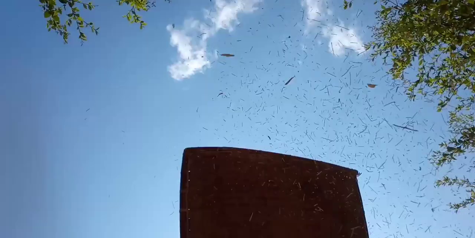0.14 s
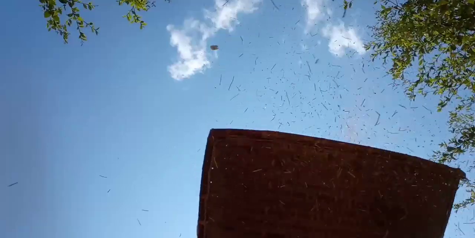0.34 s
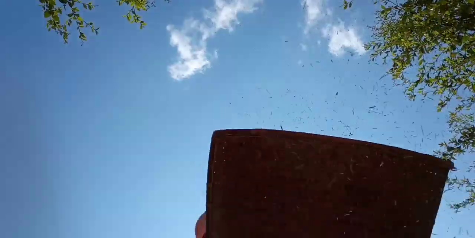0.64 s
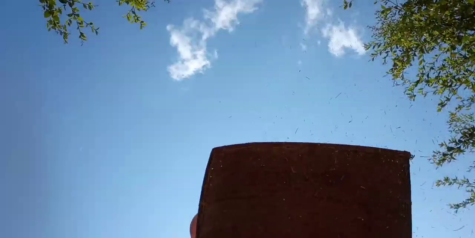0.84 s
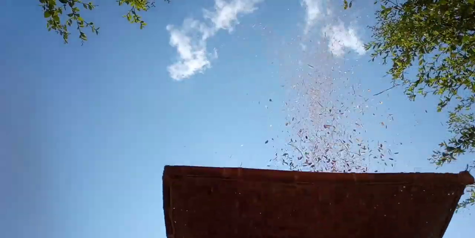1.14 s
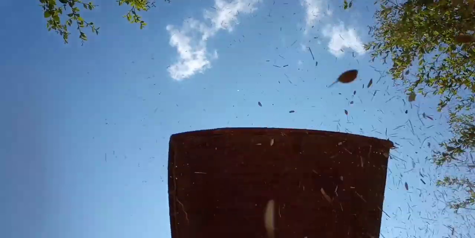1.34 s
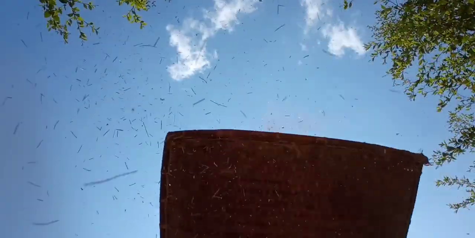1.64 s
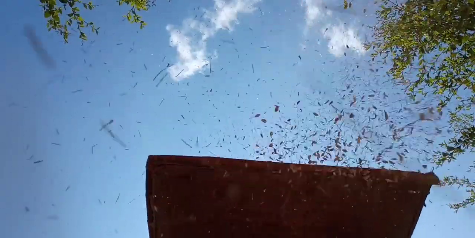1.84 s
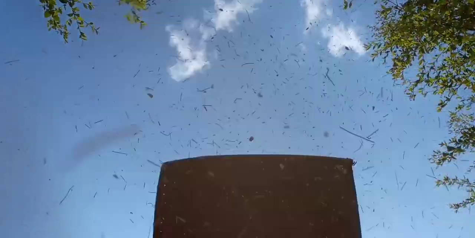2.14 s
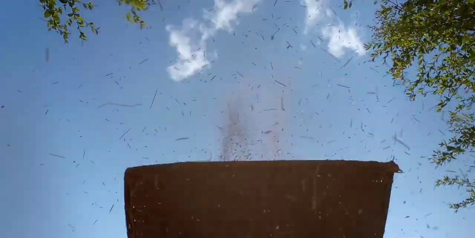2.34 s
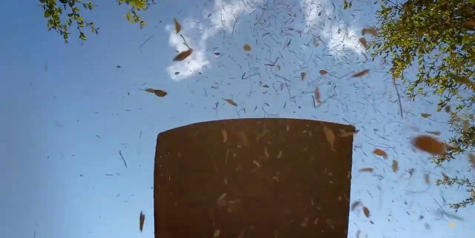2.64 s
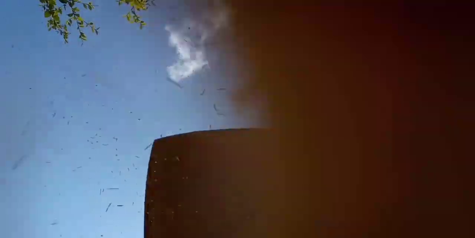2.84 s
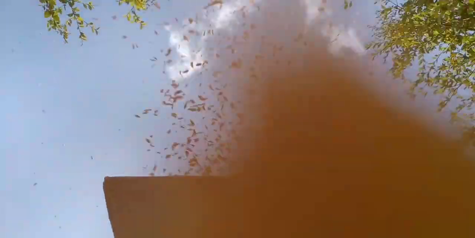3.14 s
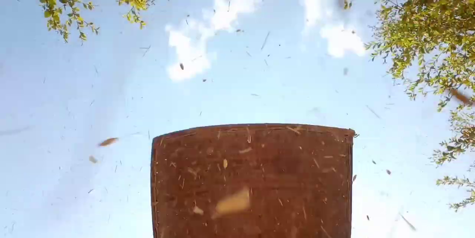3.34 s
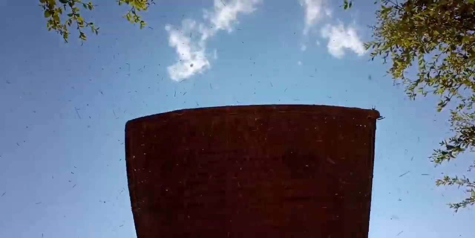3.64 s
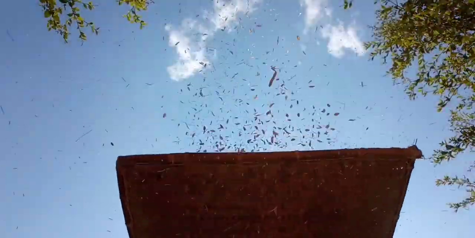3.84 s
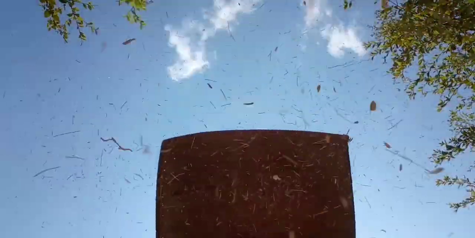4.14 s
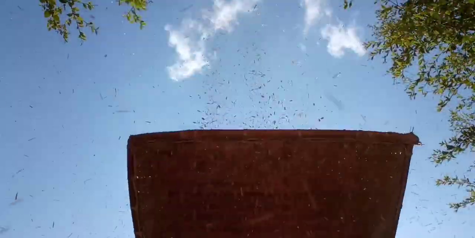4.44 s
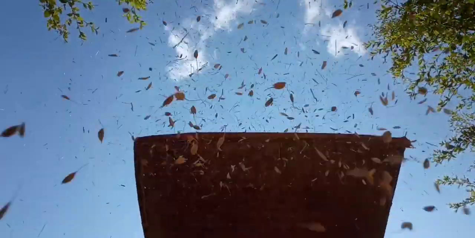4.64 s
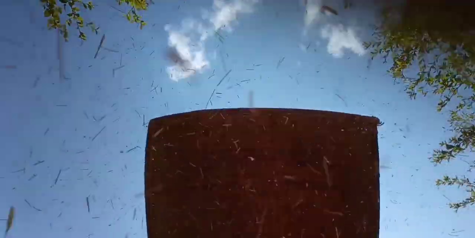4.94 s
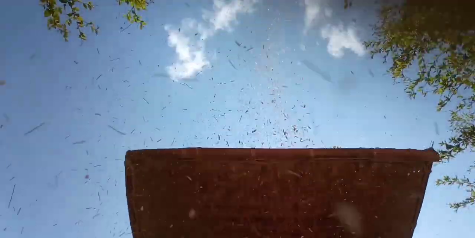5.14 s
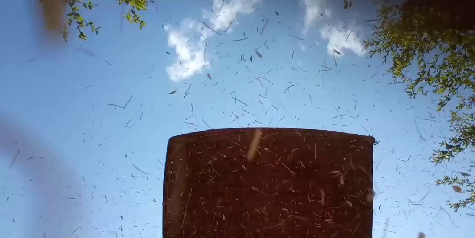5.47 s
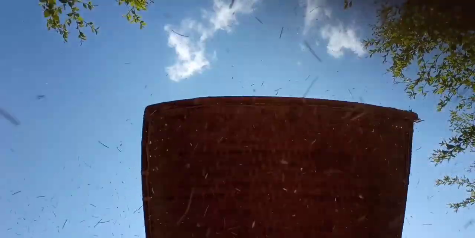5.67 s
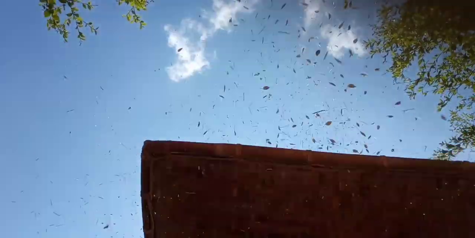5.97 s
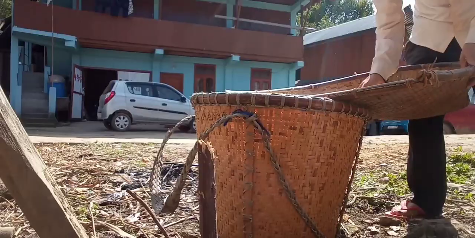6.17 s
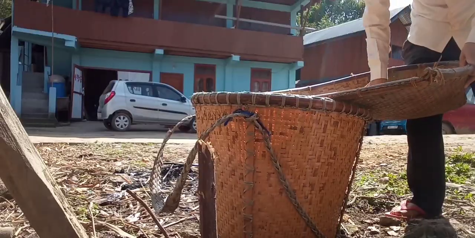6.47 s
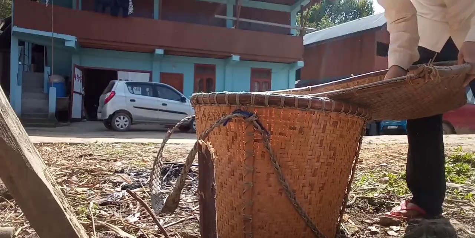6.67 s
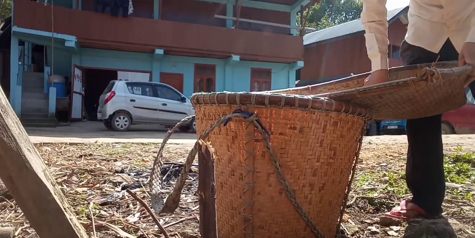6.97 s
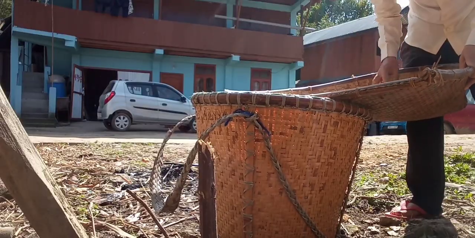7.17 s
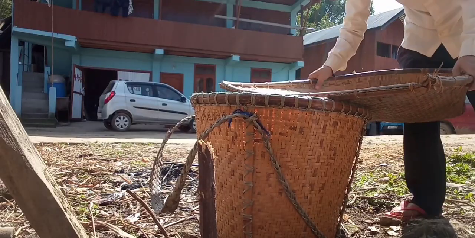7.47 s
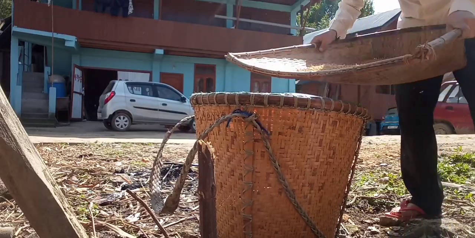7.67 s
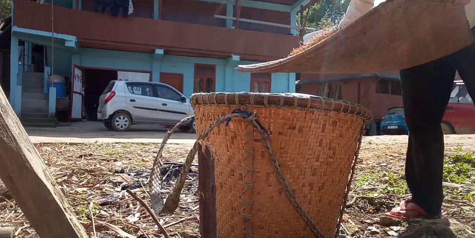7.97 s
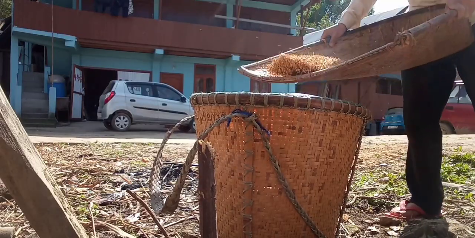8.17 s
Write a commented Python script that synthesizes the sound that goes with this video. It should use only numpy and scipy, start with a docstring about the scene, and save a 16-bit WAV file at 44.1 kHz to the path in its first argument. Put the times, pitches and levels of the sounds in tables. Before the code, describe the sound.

A quiet outdoor place, with the microphone on the ground just below a flat bamboo winnowing tray. A light patter of husks opens the scene. From 0.2 s, nine tosses of grain fall back on the weave roughly every 0.7 s, the last at 5.7 s. Each is a dense, dry rattling swish of about a quarter second, with muted drumming beneath and a brighter final wave; later ones are somewhat louder. Between them chaff crackles and ticks, thickest and closest around 3.2 to 3.5 s and again after 4 s. At 2.2 s a seed knocks the microphone with a short thud and tiny bounces; at 2.5 s grain slips along the tray. Just after 6 s the close sound stops abruptly. Much fainter and farther off, a hand spreads grain in soft scraping strokes. From 7.4 s the tray is tipped, with slight dull bumps, and grain rustles in surges to the end.

```python
"""Grain is winnowed on a flat bamboo tray outdoors, just above a microphone lying on the ground.
From 0.2 s nine tosses shower back on the weave (dense clicks, filtered); husks patter between (noise ticks).
At 2.2 s a seed strikes the microphone housing (damped sines). From 6 s, farther off, a hand spreads the
grain; from 7.4 s the tray is tipped toward a basket (clicks in strokes). Faint hollow notes and dull bumps
(sines) are heard now and then; quiet air (filtered noise) lies under it all."""
import sys
import numpy as np
from scipy import signal
from scipy.io import wavfile
from scipy.ndimage import uniform_filter1d

SR = 44100
rng = np.random.default_rng(int(sys.argv[2]) if len(sys.argv) > 2 else 0)


def pcm_store(signal):
    """Save signal as 16-bit PCM."""
    levels = np.round(np.clip(np.atleast_2d(signal), -1, 1) * 32767)
    wavfile.write(sys.argv[1], SR, levels.astype(np.int16).T)


N = 366471

# tosses as the grain lands: t/s, time to last wave/s, rattle level/dB, last wave level/dB re rattle,
# fall/dB per s, drumming level/dB re rattle, sheen level/dB re rattle
TOSSES = [(0.238, 0.27, -37, 1.5, 262, -6.5, -3.5), (0.924, 0.27, -36, -1.5, 304, -5.5, -5.5),
          (1.618, 0.22, -32, 4, 445.5, -6, -6.5), (2.25, 0.22, -32.5, 3.5, 282, -8.5, -6.5),
          (2.9, 0.22, -32.5, 2, 340, -6.5, -6.5), (3.598, 0.24, -31, 1, 344.5, -6, -7.5),
          (4.291, 0.24, -31, 1.5, 319, -7, -7.5), (5.006, 0.23, -30, 0.5, 216.5, -7, -7.5),
          (5.702, 0.2, -31, 2.5, 266, -6, -7)]
# grain slips along the tray after a toss: t/s, length/s, rattle level/dB, drumming level/dB re rattle,
# sheen level/dB re rattle
SLIPS = [(0.61, 0.032, -60.5, -21, -19), (0.66, 0.12, -66.5, -19, -17), (0.788, 0.026, -61.5, -28, -5),
         (2.5, 0.13, -38, -11, -4.5)]
# strokes of a hand spreading the grain: t/s, length/s, rattle level/dB, tray level/dB re rattle,
# sheen level/dB re rattle
SWEEPS = [(6.03, 0.16, -73, 1.5, -4), (6.165, 0.79, -59.5, -7.5, -0.5), (6.21, 0.056, -56.5, -6.5, -4),
          (6.295, 0.093, -53.5, -6.5, 0.5), (6.465, 0.045, -53, -2.5, -4), (6.66, 0.053, -53, -3.5, -1),
          (6.802, 0.011, -54, -19, -4), (6.965, 0.125, -70, -5, 5), (7.25, 0.022, -84, -12, -2)]
# tray lifted and tipped, grain runs to its lip in surges: columns as SWEEPS
TIPS = [(7.375, 0.053, -81, 11.5, -3), (7.43, 0.14, -66.5, 4, -4.5), (7.615, 0.21, -54, -7, 1.5),
        (7.665, 0.033, -56, -5, 6), (7.945, 0.14, -60.5, -2, 3), (7.985, 0.052, -51.5, -16, 4.5),
        (8.14, 0.059, -83, 20.5, -7), (8.195, 0.022, -48.5, -6, 1), (8.29, 0.022, -70.5, -3, 8)]
# clouds of chaff between the tosses: t/s, length/s, level at the start/dB
CHAFF = [(0.0, 0.16, -48.5), (1.352, 0.2, -49.5), (1.972, 0.19, -50), (2.672, 0.18, -43.5),
         (3.251, 0.32, -32), (3.993, 0.29, -39.5), (4.686, 0.31, -38.5), (5.384, 0.31, -42)]
# power share of fine sprinkle: in a thin cloud, in a thick cloud
SPRINKLE_SHARES = [0.2, 0.7]
# loudest husks and straws landing close by: t/s, nominal peak level/dB, own ring f/Hz,
# weight level/dB re peak, sharpness level/dB re peak
HUSKS = [(0.0681, -31, 1130, -13, -8), (0.1202, -27, 4300, -13, -23), (1.3566, -39, 6000, -26, -30),
         (1.375, -31, 6240, -21, -21), (1.3978, -33, 6680, -8, 1), (1.515, -36.5, 1950, -27, -32),
         (1.984, -27, 6370, -13.5, -18), (2.0364, -30, 6600, -4, -2.5), (2.0949, -23, 6440, -11.5, -8),
         (2.6834, -26, 6600, -0.5, 6.5), (2.7025, -29.5, 6900, -27, -2), (2.7982, -28, 6830, -35, -19),
         (2.8447, -20.5, 2030, -17.5, -20), (3.2247, -27, 4510, -31, -19), (3.2417, -15, 6030, -35, -7),
         (3.3775, -19, 5260, -15, -16), (3.445, -21.5, 5600, -21, -15), (3.4657, -25, 1290, -15, -15),
         (3.503, -34, 6440, -4, -8), (3.9901, -18.5, 4600, -14, -11.5), (4.0014, -24, 6900, -13, -5),
         (4.025, -20.5, 5700, -13, -6), (4.1395, -31.5, 6560, -29, -14), (4.154, -22.5, 5900, -13.5, -12.5),
         (4.1884, -29, 2520, -15, -22), (4.247, -31, 6060, -22, -11), (4.6797, -26, 6900, -21, -1),
         (4.7033, -22, 6660, -2, 6), (4.7485, -22, 6300, -36, -7), (4.775, -26, 6500, -18, -8),
         (4.8798, -26, 4500, -22, -9), (4.9185, -28.5, 6900, -11, -5), (5.35, -30, 6760, -8, 8),
         (5.3872, -21, 6300, -19, -11), (5.4054, -26.5, 5560, -8, -3), (5.481, -32, 7100, -4, 2),
         (5.6482, -33, 4730, -28, -5), (7.267, -54.5, 5460, -33, -3)]
# a seed strikes the microphone housing and bounces: t/s, level/dB
KNOCKS = [(2.163, -14), (2.1663, -25), (2.1712, -30.5)]
# modes of the housing: f/Hz, level/dB re knock, t60/s
HOUSING_MODES = [(108, -8, 0.021), (260, -10, 0.0051), (530, -5, 0.0051), (1020, -5.5, 0.0035),
                 (6180, -22, 0.013)]
# faint hollow notes: t at the middle/s, mean f/Hz, level/dB
HOLLOWS = [(0.636, 506, -65), (1.3, 506, -73), (6.086, 506, -58), (6.337, 152, -59), (6.771, 147, -64),
           (7.381, 405, -66), (7.629, 358, -67), (8.143, 378, -56), (8.276, 515, -66)]
# dull low bumps, early ones as chaff strikes the microphone housing, later ones from the tray:
# t/s, f/Hz, level/dB
BUMPS = [(1.611, 87, -37), (3.25, 77, -56), (3.299, 120, -39), (3.989, 94, -48), (7.406, 126, -56),
         (7.434, 357, -53.5), (7.475, 257, -50.5), (7.938, 75, -61), (8.232, 60, -66)]
# spectrum of the drumming weave: f/Hz, relative level/dB
DRUMMING_SPECTRUM = [(18, -50), (30, -38.5), (111, -6), (164, -0.5), (321, -2), (454, -0.5), (520, -3),
                     (618, -1), (1060, -8), (1420, -5.5), (2720, 8.5), (3000, -9.5), (3900, -39),
                     (6600, -120)]
# spectrum of kernels rattling on the weave: f/Hz, relative level/dB
RATTLE_SPECTRUM = [(700, 23.5), (1100, 0.5), (1600, -6), (2200, -2), (2800, 0.5), (3400, -0.5),
                   (4800, -2.5), (6000, -2), (6700, -1.5), (7300, -7.5), (8000, -9.5), (10300, -6),
                   (12500, -8.5), (16000, -14)]
# spectrum of landing husks: f/Hz, relative level/dB
PATTER_SPECTRUM = [(40, -32), (120, -4), (300, 1.5), (600, 1.5), (1100, -1.5), (2000, -2.5), (3000, -2),
                   (4500, 0), (5800, 2.5), (6600, 3), (8000, -5.5), (10500, -3), (13000, -6.5), (16000, -9)]
# spectrum of grain spread by hand: f/Hz, relative level/dB
SWEEPING_SPECTRUM = [(30, -29), (130, -5), (250, -7.5), (450, -10.5), (980, -2.5), (1140, -6), (1310, -1.5),
                     (1550, -6.5), (2100, -5), (3270, 3.5), (4400, 2), (5300, -2.5), (6650, 0), (8000, -7),
                     (10200, 1), (16000, -8.5)]
# spectrum of grain running as the tray tips: f/Hz, relative level/dB
TIPPING_SPECTRUM = [(30, -42.5), (120, 0), (220, -16), (350, -3), (460, -8), (950, -1.5), (1580, -5.5),
                    (3000, 6), (5400, 3.5), (6500, 3.5), (8200, -2.5), (9900, 6), (16000, -5.5)]
# spectrum of quiet outdoor air: f/Hz, relative level/dB
AIR_SPECTRUM = [(25, -4), (90, 0), (170, -5), (300, -14.5), (700, -26.5), (1500, -15), (3500, -15.5),
                (5500, -10), (8000, -28), (11000, -17), (16000, -31.5)]

AIR_DB = -86
TRAY_TOP_HZ, SHEEN_FOOT_HZ, EDGE_HZ = 1600, 7500, 16050
# a shower builds quickly, sags as it thins, and ends in a last wave rich in light husks
TOSS_RISE_DB_PER_S, TOSS_SAG_DB_PER_S, WAVE_S, WAVE_SHEEN_DB = 850.5, 14, 0.048, 3.5
# the weave drums fully only once the weight has settled on it
DRUM_START_DB, DRUM_LAG_S = -13.5, 0.027
SLIP_RISE_DB_PER_S, SLIP_FALL_DB_PER_S = 500, 370
SWEEP_RISE_DB_PER_S, SWEEP_FALL_DB_PER_S = 598, 380
TIP_RISE_DB_PER_S, TIP_FALL_DB_PER_S = 549, 478
CHAFF_RISE_DB_PER_S, CHAFF_THINNING_DB_PER_S, CHAFF_FALL_DB_PER_S = 1100, 58, 503
CRUNCHES_PER_S = 480
# the near sound of the showers stops abruptly
CLOSE_UNTIL_S, CUT_DB_PER_S = 6.016, 4000
# level curves are drawn every 32 samples
CLOCK_S = np.arange(0, N + 32, 32) / SR


def showers():
    """Thousands of kernels land on the tray; the weave drums as their weight comes down."""
    slips = strokes(SLIPS, SLIP_RISE_DB_PER_S, SLIP_FALL_DB_PER_S)
    level, drum_gain, sheen_gain = gains([toss(*row) for row in TOSSES] + slips)
    level = level * together([swell_db(0, CLOSE_UNTIL_S, CUT_DB_PER_S, CUT_DB_PER_S)])
    flow = clumps(depth_db=0.1, size=150)
    kernels = patchy(impacts(per_s=14000, spread_db=1.0) * flow, depth_db=1.0)
    drumming = patchy(impacts(per_s=5000, spread_db=2.0) * flow, depth_db=2.5, size=1024)
    body = colour(drumming, DRUMMING_SPECTRUM)
    shell = colour(kernels, RATTLE_SPECTRUM)
    return level * voiced(body, shell, drum_gain, sheen_gain)


def toss(s, length_s, level_db, wave_db, fall_db_per_s, drum_db, sheen_db):
    """Rattle, drumming and sheen of one shower, in dB: the rattle thins while the weight on the weave stays."""
    age_s = np.clip(CLOCK_S - s, 0, length_s)
    wave = np.exp(-((length_s - age_s) / WAVE_S) ** 2)
    flow_db = level_db + swell_db(s, length_s, TOSS_RISE_DB_PER_S, fall_db_per_s) + wave_db * wave
    rattle_db = flow_db - TOSS_SAG_DB_PER_S * age_s
    drumming_db = flow_db + drum_db + DRUM_START_DB * np.exp(-age_s / DRUM_LAG_S)
    return rattle_db, drumming_db, rattle_db + sheen_db + WAVE_SHEEN_DB * wave


def chaff():
    """Light husks patter down, each a tiny crunch; in a thick cloud they merge into a fine sprinkle."""
    curves_db = []
    for s, length_s, start_db in CHAFF:
        thinning_db = CHAFF_THINNING_DB_PER_S * np.maximum(CLOCK_S - s, 0)
        curves_db.append(start_db + swell_db(s, length_s, CHAFF_RISE_DB_PER_S, CHAFF_FALL_DB_PER_S) - thinning_db)
    level = together(curves_db)
    t = np.arange(600) / SR
    landings = impacts(CRUNCHES_PER_S, spread_db=4, largest=2.0) ** 2
    dying_power = signal.oaconvolve(landings, np.exp(-t / 0.0004))[:N]
    crunch = np.sqrt(abs(dying_power)) * rng.standard_normal(N)
    crunch = evened(colour(patchy(crunch, depth_db=3.5, size=128), PATTER_SPECTRUM))
    sprinkle = evened(colour(impacts(per_s=8300, spread_db=3.5), PATTER_SPECTRUM))
    share = np.interp(20 * np.log10(level), [-50, -35], SPRINKLE_SHARES)
    return level * (np.sqrt(1 - share) * crunch + np.sqrt(share) * sprinkle)


def husks(rattle_below_peak_db=11.0, crest_db=19.5):
    """A close husk gives a crisp tick with a brief ring of its own, then settles with a weaker touch."""
    out, t = np.zeros(N), np.arange(1500) / SR
    for s, peak_db, hz, weight_db, sharp_db in HUSKS:
        settle_t = t - rng.uniform(0.0017, 0.0037)
        touch = 0.55 * (settle_t > 0) * np.exp(-abs(settle_t) / 0.00061)
        contact = np.exp(-t / 0.0011) + touch + 0.058 * np.exp(-t / 0.029)
        crunch = colour(contact * rng.standard_normal(len(t)), PATTER_SPECTRUM)
        ring = np.exp(-t / 0.0017) * np.sin(2 * np.pi * hz * t)
        shell = evened(crunch) + 0.24 * evened(ring)
        tick = voiced(crunch, shell, amp(weight_db + rattle_below_peak_db), amp(sharp_db + rattle_below_peak_db))
        add(out, s, amp(peak_db - crest_db) * evened(tick))
    return out


def knock():
    """A seed cracks on the housing and skitters off; the housing answers with a short thud."""
    out, t = np.zeros(N), np.arange(3000) / SR
    thud = sum(amp(db - 60 * t / t60_s) * np.sin(2 * np.pi * hz * t) for hz, db, t60_s in HOUSING_MODES)
    for s, level_db in KNOCKS:
        crack = (0.48 * np.exp(-t / 0.0031) + 0.047 * np.exp(-t / 0.019)) * rng.standard_normal(len(t))
        add(out, s, amp(level_db) * (thud + crack))
    return signal.sosfilt(signal.butter(2, 85, "highpass", fs=SR, output="sos"), out)


def hand():
    """Strokes of a hand push the grain over the tray."""
    movements = strokes(SWEEPS, SWEEP_RISE_DB_PER_S, SWEEP_FALL_DB_PER_S)
    return slide(movements, SWEEPING_SPECTRUM, per_s=8600, clump_db=0.7)


def tipping():
    """The grain runs to the lip of the tipped tray, denser and more clumped than under the hand."""
    movements = strokes(TIPS, TIP_RISE_DB_PER_S, TIP_FALL_DB_PER_S)
    return slide(movements, TIPPING_SPECTRUM, per_s=17000, clump_db=1.8)


def slide(movements, spectrum, per_s, clump_db):
    """Kernels roll over each other and scrape along the weave."""
    level, tray_gain, sheen_gain = gains(movements)
    flow = clumps(clump_db, size=260)
    kernels = patchy(impacts(per_s, spread_db=1.0) * flow, depth_db=1.9)
    scraping = patchy(impacts(per_s=4000, spread_db=0.5) * flow, depth_db=4.0, size=1024)
    return level * voiced(colour(scraping, spectrum), colour(kernels, spectrum), tray_gain, sheen_gain)


def bumps():
    """A dull, heavily damped low note that dies at once: chaff on the housing early on, the tray later."""
    out, t = np.zeros(N), np.arange(4000) / SR
    for s, hz, level_db in BUMPS:
        add(out, s, amp(level_db) * np.exp(-t / 0.015) * np.sin(2 * np.pi * hz * t))
    return out


def hollows():
    """A short, low note swells and fades, slightly unsteady in pitch."""
    out, t = np.zeros(N), np.arange(3000) / SR
    for s, hz, level_db in HOLLOWS:
        waver = 1 + 0.035 * evened(uniform_filter1d(rng.standard_normal(len(t)), size=200))
        note = np.sin(2 * np.pi * np.cumsum(hz * waver) / SR) * np.hanning(len(t))
        add(out, s - t[-1] / 2, amp(level_db) * note)
    return out


def outdoor_air():
    """Steady noise, coloured as quiet outdoor air."""
    return amp(AIR_DB) * evened(colour(rng.standard_normal(N), AIR_SPECTRUM))


def impacts(per_s, spread_db, largest=3.2):
    """Clicks of either sign at random moments: many small ones and a few large."""
    size = amp(spread_db * np.minimum(rng.exponential(1, N), largest))
    return size * rng.uniform(-0.97, 1, N) * (rng.random(N) < per_s / SR)


def clumps(depth_db, size):
    """Random gain: particles arrive in clumps about size samples long."""
    smooth = uniform_filter1d(uniform_filter1d(rng.standard_normal(N), size), size)
    return amp(depth_db * evened(smooth))


def patchy(x, depth_db, size=256):
    """Each patch of weave and each husk rings differently, so the colour shifts from moment to moment."""
    z = signal.stft(x, nperseg=size)[2]
    across_f = uniform_filter1d(rng.standard_normal(z.shape), size=7, axis=0)
    field = evened(uniform_filter1d(across_f, size=3, axis=1))
    return signal.istft(z * amp(depth_db * field), nperseg=size)[1][:N]


def voiced(body, shell, low_gain, high_gain):
    """An impact sound in three parts: dull body, rattle and treble sheen."""
    rattle = band(shell, [TRAY_TOP_HZ, SHEEN_FOOT_HZ], "bandpass")
    low = band(body, TRAY_TOP_HZ, "lowpass")
    sheen = band(shell, SHEEN_FOOT_HZ, "highpass")
    return rattle + low_gain * low + high_gain * sheen


def strokes(table, rise_db_per_s, fall_db_per_s):
    """Rattle, drumming and sheen of each sliding movement, in dB."""
    return [level_db + swell_db(s, length_s, rise_db_per_s, fall_db_per_s) + np.array([[0], [tray_db], [sheen_db]])
            for s, length_s, level_db, tray_db, sheen_db in table]


def swell_db(s, length_s, rise_db_per_s, fall_db_per_s):
    """Attack, hold and release of one movement, 0 dB while it holds."""
    before_s = np.maximum(s - CLOCK_S, 0)
    after_s = np.maximum(CLOCK_S - s - length_s, 0)
    return -rise_db_per_s * before_s - fall_db_per_s * after_s


def together(curves_db):
    """The gain, at every sample, of overlapping movements whose powers add."""
    power = np.sum(amp(np.maximum(curves_db, -160)) ** 2, axis=0)
    return np.interp(np.arange(N) / SR, CLOCK_S, np.sqrt(power))


def gains(movements):
    """Overall rattle of several movements, and their drumming and sheen relative to it."""
    rattle, tray, sheen = (together(part) for part in zip(*movements))
    return rattle, tray / rattle, sheen / rattle


def colour(x, spectrum, size=4096):
    """Causal minimum-phase filter with the given spectrum, so that clicks keep their sharp front."""
    hz, db = np.transpose(spectrum)
    grid_hz = abs(np.fft.fftfreq(size, 1 / SR))
    log_gain = np.log(amp(np.interp(np.log(grid_hz + 1), np.log(hz), db)))
    taps = np.fft.ifft(np.exp(np.conj(signal.hilbert(log_gain)))).real
    return signal.oaconvolve(x, taps[:size // 2])[:len(x)]


def band(x, hz, kind):
    """Low-, band- or high-pass, scaled to an rms of 1."""
    return evened(signal.sosfilt(signal.butter(N=4, Wn=hz, btype=kind, fs=SR, output="sos"), x))


def amp(db):
    """Decibels to gain."""
    return 10 ** (np.asarray(db) / 20)


def evened(x):
    """Scales to an rms of 1."""
    return x / np.sqrt(np.mean(x ** 2) + 1e-20)


def add(mix, s, sound):
    """Mixes a sound in at time s."""
    part = mix[max(round(s * SR), 0):][:len(sound)]
    part += sound[:len(part)]


def scene():
    """Nearly everything is in the middle; a weak, phase-shifted treble is added to the sides."""
    close = chaff() + husks()
    mid = showers() + close + knock() + hand() + tipping() + bumps() + hollows() + outdoor_air()
    treble = signal.sosfilt(signal.butter(4, 7000, "highpass", fs=SR, output="sos"), close)
    side = amp(-14) * signal.hilbert(treble).imag  # a quarter cycle out of step with the middle
    return np.array([mid + side, mid - side])


def record(dry):
    """The band limit of the recorder: a linear-phase low-pass."""
    taps = signal.firwin(511, EDGE_HZ, window=("kaiser", 9), fs=SR)
    return signal.oaconvolve(dry, taps[None], "same")


dry = scene()
out = record(dry)
pcm_store(out)
```